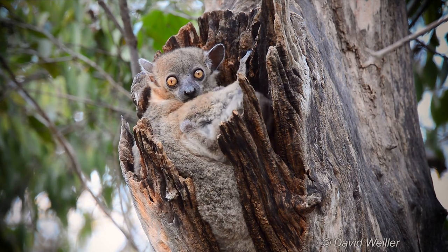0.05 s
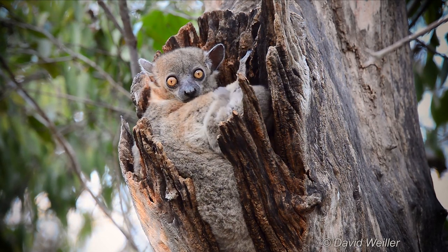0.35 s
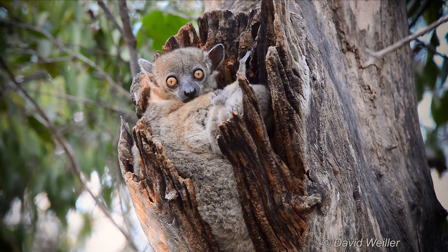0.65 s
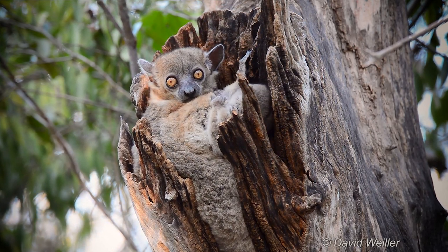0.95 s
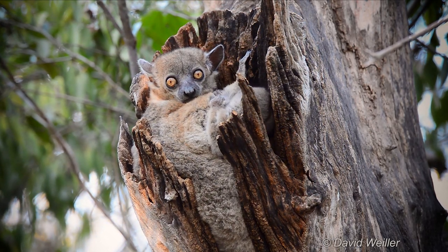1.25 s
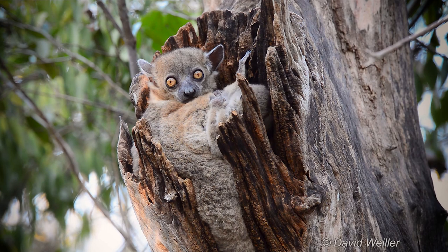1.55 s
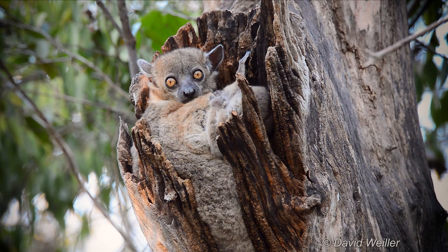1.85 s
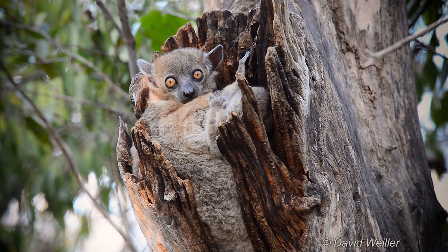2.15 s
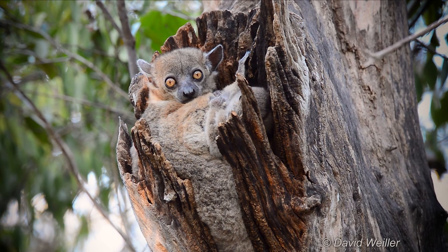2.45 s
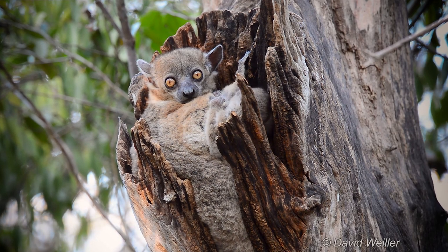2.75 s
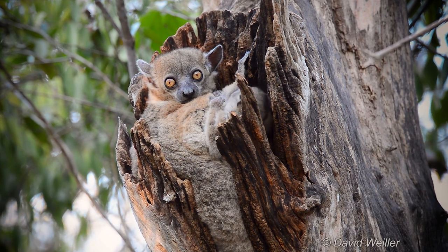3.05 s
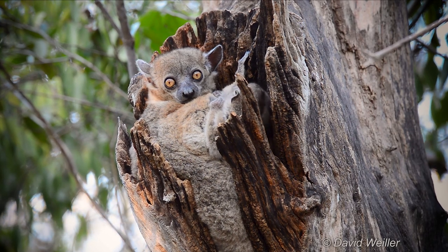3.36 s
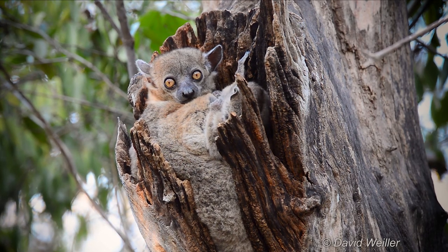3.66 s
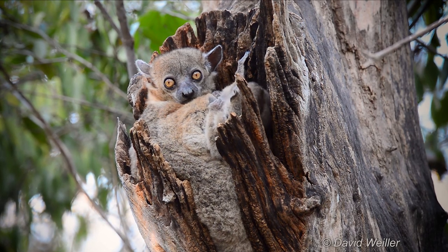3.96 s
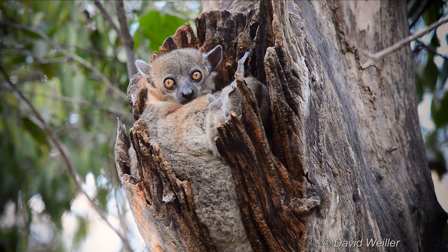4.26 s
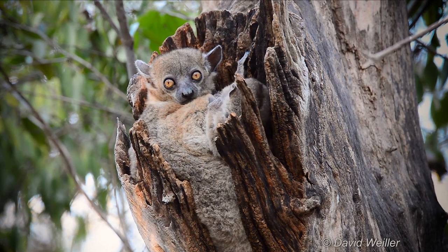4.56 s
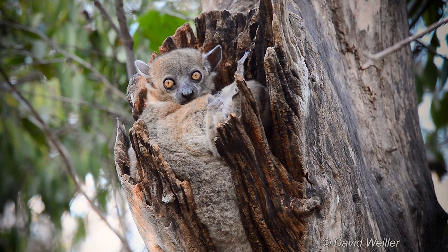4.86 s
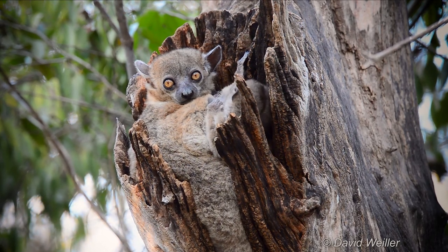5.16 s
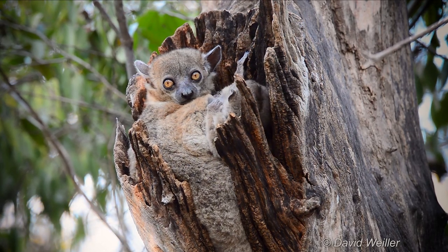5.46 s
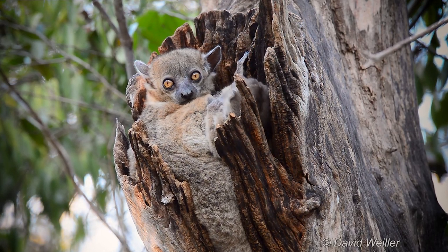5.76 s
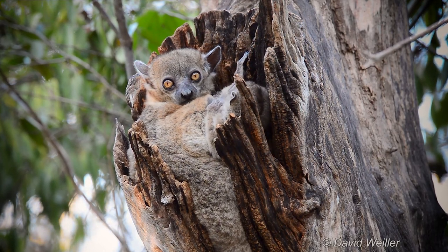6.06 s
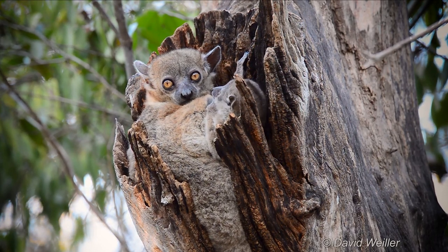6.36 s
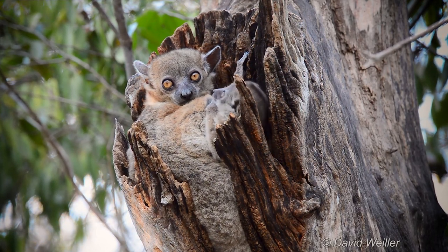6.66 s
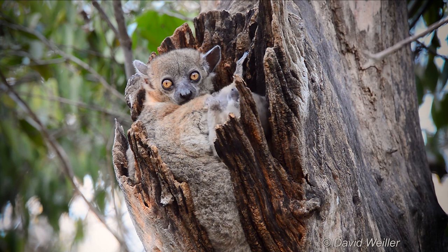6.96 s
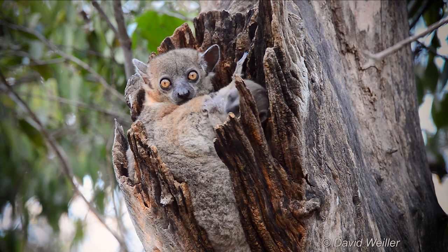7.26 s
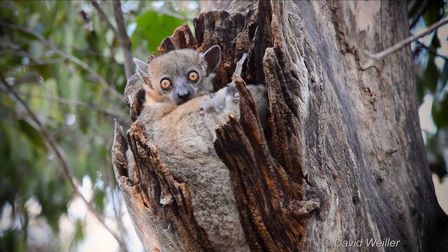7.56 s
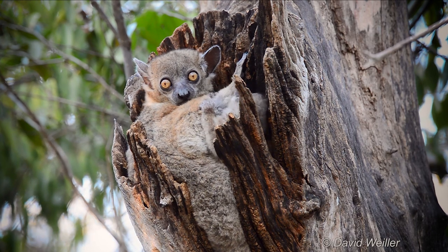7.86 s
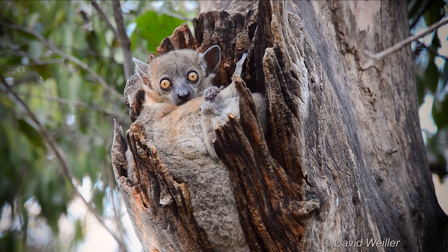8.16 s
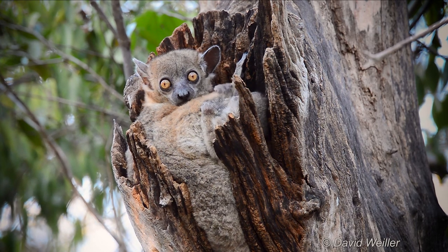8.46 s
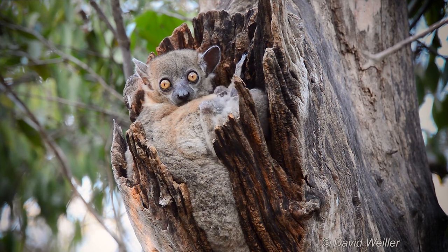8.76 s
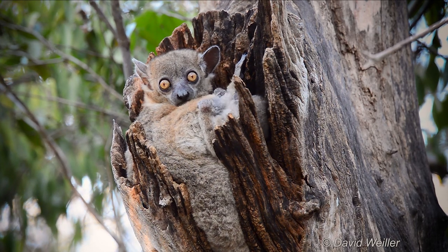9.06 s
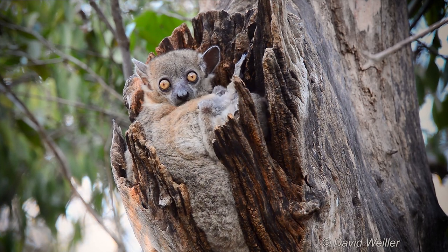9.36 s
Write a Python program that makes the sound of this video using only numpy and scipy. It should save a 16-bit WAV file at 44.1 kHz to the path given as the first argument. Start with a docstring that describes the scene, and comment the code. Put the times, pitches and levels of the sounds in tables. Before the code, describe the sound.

A still forest holds a faint rustle of air and a thin, steady trill of distant crickets. A nearer bush cricket makes a high double zip a little more than once a second. In the first 1.5 seconds, birds give light chirps and short rough notes, and one soft low bump reaches the microphone at 1.2 seconds. A rising whistle comes at 2.7 seconds and a lower, scooping one at 4.3. Louder slurred whistles follow at 5.2 and 5.8 seconds, echoing among the trunks. From about 5 seconds, faint high runs of cricket ticks and buzzes become more frequent. The birds call loudly again at 7.3 seconds, then in a quick cluster of gliding whistles from 7.9 to 8.4. Around 9 seconds a few weaker chirps sound over a very faint hum, with one tiny dry click at 9.3.

```python
"""Birds and crickets in a still, dry forest.

Birds trade loud slurred whistles and chirps (a gliding syrinx tone) and short rough notes that
echo among the trunks. Behind them bush crickets zip, tick and buzz in the treble by scraping
their wings, far crickets trill and the air rustles faintly. One soft low bump reaches the
microphone; near the end come a tiny click and a faint hum."""
import sys
import numpy as np
from scipy import signal
from scipy.fft import rfft, irfft, next_fast_len
from scipy.io import wavfile
from scipy.ndimage import uniform_filter1d, map_coordinates

SR = 44100
rng = np.random.default_rng(int(sys.argv[2]) if len(sys.argv) > 2 else 0)


def dump_mix(stems):
    """Bounce the given channels to the path in sys.argv[1] as a 16-bit WAV at rate SR."""
    frames = np.atleast_2d(stems).T  # one column per channel
    limited = np.clip(frames, -1, 1)  # hard clip at full scale
    pcm = np.round(limited * 32767).astype(np.int16)
    wavfile.write(sys.argv[1], SR, pcm)


N = 414981


def from_db(db):
    return 10 ** (np.asarray(db) / 20)


def unit_rms(x):
    return x / np.sqrt(np.mean(x ** 2) + 1e-20)


def phase_of(hz):
    return 2 * np.pi * np.cumsum(hz) / SR


def add(out, start_s, sound):
    at = int(np.clip(round(start_s * SR), 0, N))
    out[at:at + len(sound)] += sound[:N - at]


def colour(x, points):
    """Filter by a curve of freq_hz, gain_db."""
    hz, db = np.transpose(points)
    bins_hz = np.maximum(np.fft.rfftfreq(len(x), 1 / SR), 1)
    return irfft(rfft(x) * from_db(np.interp(np.log(bins_hz), np.log(hz), db)), len(x))


def drift(rate_hz, size=N):
    """Interpolated noise, standard deviation about 1."""
    steps = np.arange(size) * rate_hz / SR
    return map_coordinates(rng.standard_normal(int(steps[-1]) + 4), [steps + 1], order=1) * np.sqrt(1.5)


# Beak response to the second harmonic: harmonic_hz, gain_db
BEAK_RESPONSE = [(2400, -28), (3100, -27.5), (3700, -28), (4400, -20), (5450, -14), (6100, -34),
                 (8000, -38)]


def whistle(curve, waver, press_db, flutter_db=2.0, third_db=-25, edge_s=.003):
    """Near-pure gliding syrinx tone; pressing and the beak lift its overtones. Returns start_s, sound."""
    times_s, hz, db = np.transpose(curve)
    times_s = np.maximum.accumulate(times_s) + np.arange(len(times_s)) / SR
    t = np.arange(times_s[0] - edge_s, times_s[-1] + edge_s, 1 / SR)
    glide_hz = uniform_filter1d(np.interp(t, times_s, hz), size=180, mode="nearest")
    phase = phase_of(glide_hz * (1 + waver * drift(393.6, len(t))))
    edges = np.sin(np.pi / 2 * np.clip(np.minimum(t - t[0], t[-1] - t) / (2 * edge_s), 0, 1))
    level = from_db(np.interp(t, times_s, db) + flutter_db * drift(150, len(t))) * edges
    overtone_gain = from_db(press_db + np.interp(2 * glide_hz, *np.transpose(BEAK_RESPONSE)))
    overtones = overtone_gain * (np.sin(2 * phase) + from_db(third_db) * np.sin(3 * phase))
    return t[0], np.sqrt(2) * level * (np.sin(phase) + overtones)


# Whistle curves: time_s, pitch_hz, relative_db
CLIMB = [(2.615, 975, -68), (2.635, 1176, -60.5), (2.671, 1215, -61), (2.691, 1400, -54.5),
         (2.703, 1820, -42), (2.715, 1883, -45.5), (2.753, 1845, -43), (2.779, 1960, -42.5),
         (2.8, 2270, -51)]
LOW_SCOOP = [(4.245, 1190, -61), (4.255, 1404, -56), (4.271, 1413, -54.5), (4.287, 1367, -42.5),
             (4.305, 1331, -43), (4.385, 1321, -46.5), (4.403, 1384, -40.5), (4.421, 1825, -46.5),
             (4.428, 1992, -61)]
SWOOP = [(5.096, 2390, -62), (5.108, 3240, -53), (5.12, 3380, -52), (5.156, 3080, -38), (5.172, 3114, -42),
         (5.18, 2520, -41.5), (5.194, 2250, -40), (5.218, 2045, -27), (5.234, 1898, -38),
         (5.256, 1790, -35.5), (5.274, 1889, -33.5), (5.288, 2112, -33.5)]
DEEP_SCOOP = [(5.724, 1715, -35.5), (5.738, 2046, -37), (5.744, 2019, -34), (5.782, 1672, -25.5),
              (5.81, 1556, -29), (5.838, 1565, -29), (5.858, 1632, -25), (5.872, 1930, -33.5)]
RISE = [(7.232, 1712, -38.5), (7.242, 1985, -33), (7.282, 2077, -28.5), (7.308, 2270, -33.5)]
HIGH_FLIP = [(7.311, 2613, -38.5), (7.331, 2799, -48.5), (7.355, 2737, -41.5), (7.367, 2676, -44),
             (7.375, 2140, -28), (7.382, 1580, -39.5)]
HIGH_HOLD = [(7.898, 2772, -44), (7.91, 2533, -36.5), (7.936, 2581, -30), (7.947, 2605, -45)]
ARCH = [(8.115, 942, -68.5), (8.155, 997, -62.5), (8.171, 1238, -53.5), (8.207, 1372, -35),
        (8.233, 1760, -25.5), (8.259, 1946, -36.5), (8.281, 2100, -34.5), (8.291, 2117, -44),
        (8.299, 2153, -27), (8.317, 2116, -39), (8.343, 1759, -26.5), (8.357, 1545, -32.5)]
# Slurred whistles: curve, press_db, direct_db, echo_db
SLURS = [(CLIMB, -4, 1.3, 0.71), (LOW_SCOOP, -1.5, 0.7, 0), (SWOOP, 2.7, -0.26, -0.84),
         (DEEP_SCOOP, 1, -1.1, -1.1), (RISE, -3, -.5, -0.9), (HIGH_FLIP, -8, 1, 1),
         (HIGH_HOLD, 1.1, 0.53, 1), (ARCH, -7, -0.83, -.5)]


def bird_slurs(waver=.005):
    """Long whistles; the way the bird faces splits each into direct sound and echo send."""
    direct, send = np.zeros((2, N))
    for curve, press_db, direct_db, echo_db in SLURS:
        start_s, sound = whistle(curve, waver, press_db)
        add(direct, start_s, from_db(direct_db) * sound)
        add(send, start_s, from_db(echo_db) * sound)
    return np.array([direct, send])


# Chirps: start_s, length_s, start_hz, middle_hz, end_hz, relative_db, peak_fraction, press_db,
# distance (-1 closest, 1 far)
CHIRPS = [(0.105, 0.048, 1356, 1420, 1800, -55, 0.7, -5, 0.27),
          (0.15, 0.093, 2500, 2610, 2580, -64.5, 0.2, -1, 1),
          (0.476, 0.073, 2950, 3340, 3410, -60.5, 0.1, 3, 1),
          (0.61, 0.083, 2850, 2375, 2220, -52.5, 0.7, -8, 1),
          (0.692, 0.087, 2390, 2190, 1934, -46, 0.87, -3.5, 1),
          (.89, 0.028, 2440, 2650, 2850, -49.5, 0.5, -7, 0.37),
          (0.95, 0.07, 3410, 3120, 2820, -40.5, 0.8, -5, -0.32),
          (1.231, 0.057, 1980, 2047, 2040, -57.5, 0.6, 9.5, 0.88),
          (1.287, 0.0543, 2003, 1875, 1660, -53.5, 0.65, -8, 1),
          (5.68, 0.034, 1595, 1663, 1920, -37, 0.8, 0, 0.47),
          (7.384, .02, 2666, 1514, 2070, -36.5, 0, -1, -0.38),
          (7.836, 0.0646, 3690, 3273, 3310, -40, 0.9, -7, 0.5),
          (7.967, 0.019, 2684, 2820, 1890, -33.5, 0.36, 1, 0.42),
          (8.1, 0.039, 1700, 1880, 1920, -50, 0, -9, 0),
          (8.901, 0.035, 2094, 1997, 2070, -59.5, 0.4, -3, 1),
          (9.172, 0.12, 1600, 1740, 1870, -64, 0.6, -4, 1),
          (9.391, 0.038, 1510, 1400, 1400, -43, 0.9, 7, 0.2)]


def bird_chirps(rise_db=10, fall_db=14, near_waver=.005, far_waver=.017):
    """Short whistles on a parabola of pitch; far birds waver more and are mostly echo."""
    direct, send = np.zeros((2, N))
    u = np.linspace(0, 1, 20)
    for start_s, length_s, *pitches_hz, db, peak_fraction, press_db, distance in CHIRPS:
        hz = np.polyval(np.polyfit([0, .5, 1], pitches_hz, 2), u)
        top = np.clip(peak_fraction, .05, .95)
        drop_db = np.where(u < top, rise_db * (1 - u / top) ** 2, fall_db * ((u - top) / (1 - top)) ** 2)
        curve = np.transpose([start_s + length_s * u, hz, db - drop_db])
        waver = near_waver * (far_waver / near_waver) ** distance
        onset_s, sound = whistle(curve, waver, press_db)
        add(direct, onset_s, from_db(-3.5 * distance) * sound)
        add(send, onset_s, from_db(3 * distance - .5) * sound)
    return np.array([direct, send])


def rough_tone(length_s, hz, scatter_hz, jitter_rate_hz=900, rough_db=4, second_db=-22):
    """Band-passed swell whose pitch and strength jump about."""
    size = int(length_s * SR)
    phase = phase_of(hz + scatter_hz * drift(jitter_rate_hz, size))
    tone = np.sin(phase) * from_db(rough_db * drift(500, size))
    edge_ratio = 1 + 2.9 * scatter_hz / hz
    band = signal.butter(2, [hz / edge_ratio, hz * edge_ratio], "band", fs=SR, output="sos")
    tone = unit_rms(signal.sosfilt(band, tone)) + from_db(second_db) * np.sin(2 * phase)
    return tone * np.sin(np.linspace(0, np.pi, size))


# Short rough bands: middle_s, length_s, pitch_hz, scatter_hz, level_db
ROUGH_BANDS = [(0.024, 0.058, 1675, 149, -64.5), (0.546, 0.15, 3290, 254, -62.5),
               (0.935, 0.13, 1910, 175, -58), (1.05, 0.035, 2250, 390, -50.5),
               (1.039, 0.025, 4400, 200, -63.5), (1.141, 0.077, 5720, 600, -63.5),
               (1.199, 0.036, 1334, 148, -62.5), (1.371, 0.11, 1854, 119, -59),
               (2.682, 0.024, 1542, 200, -56), (2.947, 0.061, 2080, 172.4, -57.5),
               (3.067, 0.057, 2110, 259, -58), (3.397, 0.086, 1876, 260, -58.5),
               (4.236, 0.041, 1875, 450, -60), (5.716, 0.042, 2220, 500, -48),
               (6.271, 0.22, 3940, 280, -74), (7.228, .044, 2150, 378, -42.5), (7.982, .08, 5520, 260, -54),
               (7.967, .06, 2844, 180, -34.5)]


def rough_bands():
    """Short rough bands of sound: hoarse notes and a whistle's diffuse ring among the trees."""
    out = np.zeros(N)
    for middle_s, length_s, hz, scatter_hz, db in ROUGH_BANDS:
        add(out, middle_s - length_s / 2, from_db(db) * rough_tone(length_s, hz, scatter_hz))
    return out


def wing_stroke(hz, fall, length_s, scrape=.011):
    """A file runs over the wing's edge and slows, so its tone falls."""
    u = np.linspace(0, 1, int(length_s * SR))
    pitch_hz = hz * (1 + fall * (.5 - u) + scrape * drift(1800, len(u)))
    return np.sin(np.pi * u) * np.sin(phase_of(pitch_hz))


def stridulation(pitch_hz, width_hz, stroke_hz, depth):
    """Swelling burst of wing strokes: a narrow scratchy band along a pitch curve."""
    size, phase = len(pitch_hz), phase_of(pitch_hz)
    band = drift(2 * width_hz, size) * np.sin(phase) + drift(2 * width_hz, size) * np.cos(phase)
    throb = 1 + depth * np.sin(2 * np.pi * stroke_hz * np.arange(size) / SR)
    return unit_rms(band * throb) * np.sin(np.linspace(0, np.pi, size))


def buzz(length_s, hz):
    """Fast wing strokes at a steady pitch."""
    return stridulation(np.full(int(length_s * SR), hz), width_hz=190, stroke_hz=80, depth=.7)


# Double zips: time_s, relative_db
ZIP_PAIRS = [(.7786, -55.5), (1.78, -56), (2.633, -56.5), (3.473, -56.5), (4.364, -57), (5.237, -53),
             (5.953, -55.5), (6.862, -55.5), (7.8401, -54), (8.665, -55.5), (9.3831, -54)]


def cricket_zips(hz=7270):
    """A near bush cricket makes two wing strokes, the first slightly softer."""
    out = np.zeros(N)
    for time_s, db in ZIP_PAIRS:
        for lead_s, gain_db in ((.0556, -4), (.0051, -3)):
            add(out, time_s - lead_s, from_db(db + gain_db) * wing_stroke(hz, fall=.093, length_s=.0221))
    return out


# Tick phrases: run_start_s, relative_db
TICK_PHRASES = [(-.15, -76.5), (.583, -75), (1.33, -74.5), (5.24, -70.5), (5.936, -70.5), (6.635, -70),
                (7.371, -70.5), (8.116, -71)]


def cricket_ticks(tick_hz=10870, buzz_hz=10520, lead_s=.135, run_s=.27, buzz_s=.17):
    """Another near bush cricket: a lone tick, then a quickening run over a buzz."""
    out = np.zeros(N)
    gaps_s = .0205 + .022 * .55 ** np.arange(20)
    offsets_s = np.append(-lead_s, np.cumsum(gaps_s) - gaps_s)
    for start_s, db in TICK_PHRASES:
        ticks_s = start_s + offsets_s[offsets_s <= run_s]
        for tick_s in ticks_s[ticks_s >= 0]:
            add(out, tick_s, from_db(db + 3) * wing_stroke(tick_hz, fall=.04, length_s=.017, scrape=.005))
        add(out, start_s + (run_s - buzz_s) / 2, from_db(db - 6.5) * buzz(buzz_s, buzz_hz))
    return out


def bump(start_s=1.187, hz=47, gain_db=-45, length_s=.072, attack_s=.0023):
    """A soft knock rocks the microphone for a few slow cycles."""
    out, t = np.zeros(N), np.arange(int(length_s * SR)) / SR
    envelope = np.cos(np.pi / 2 * t / length_s) ** 2 * (1 - np.exp(-t / attack_s))
    add(out, start_s, from_db(gain_db) * envelope * np.sin(2 * np.pi * hz * t))
    return out


def twig(start_s=9.262, level_db=-57, decay_s=.0025):
    """One tiny dry click."""
    out, t = np.zeros(N), np.arange(SR // 50) / SR
    band = signal.butter(2, [1200, 7000], "band", fs=SR, output="sos")
    crack = unit_rms(signal.sosfilt(band, rng.standard_normal(len(t))))
    add(out, start_s, from_db(level_db) * crack * np.exp(-t / decay_s))
    return out


# Buzz series: first_s, stop_s, period_s, length_s, pitch_hz, level_db
BUZZ_SERIES = [(5.63, 8.1, .386, .09, 10070, -79), (4.85, 8.9, .768, .08, 10680, -75),
               (3.78, 9.2, 5.12, .28, 10290, -77)]


def paced_buzzes():
    """Far insects, each buzzing at an even pace."""
    out = np.zeros(N)
    for first_s, stop_s, period_s, length_s, hz, db in BUZZ_SERIES:
        for middle_s in np.arange(first_s, stop_s, period_s):
            add(out, middle_s - length_s / 2, from_db(db) * buzz(length_s, hz))
    return out


# Rising lisps: time_s
LISPS_S = [.42, 1.18, 1.58, 2.27, 2.78, 3.28, 3.83, 4.08, 4.5, 5.24, 5.89, 6.45, 7.29, 7.88, 8.62, 9.06,
           9.31]


def far_lisps(length_s=.3, lead_s=.16, low_hz=7550, top_hz=8200, base_db=-79.5, growth_db_per_s=.8):
    """A far insect's lisps climb as its wings speed up, each louder than the last."""
    out = np.zeros(N)
    climb_hz = low_hz + (top_hz - low_hz) * np.sin(np.linspace(0, np.pi / 2, int(length_s * SR)))
    for time_s in LISPS_S:
        pitch_hz = climb_hz * (1 + .008 * drift(25, len(climb_hz)))
        lisp = stridulation(pitch_hz, width_hz=400, stroke_hz=29, depth=.18)
        add(out, time_s - lead_s, from_db(base_db + growth_db_per_s * time_s) * lisp)
    return out


def stray_buzzes(count=14, hz=10480, spread_hz=140, length_s=.11, level_db=-81, spread_db=2):
    """Other bush crickets buzz at random moments."""
    out = np.zeros(N)
    for start_s in rng.uniform(0, N / SR, count):
        sound = buzz(length_s, rng.normal(hz, spread_hz))
        add(out, start_s, from_db(rng.normal(level_db, spread_db)) * sound)
    return out


def stray_zips(count=40, hz=7280, spread_hz=260, peak_db=-69, spread_db=3):
    """Bush crickets further off make single wing strokes at random moments."""
    out = np.zeros(N)
    for start_s in rng.uniform(0, N / SR, count):
        stroke = wing_stroke(rng.normal(hz, spread_hz), fall=.093, length_s=.024)
        add(out, start_s, from_db(rng.normal(peak_db, spread_db)) * stroke)
    return out


# Far choirs: pitch_hz, width_hz, level_db, swell_db, stroke_hz, stroke_depth
CHOIRS = [(4180, 154, -77.5, 0.8, 30, 0.5), (4774, 8.6, -79, 1.5, 16.5, 0.07),
          (5000, 240, -78.5, -1.5, 30, 0), (5500, 82, -82.5, -5.5, 44, .1), (7270, 230, -74.5, 3, 56, 0.4),
          (7850, 230, -78.5, 1.8, 32, 0.2), (10620, 210, -83, -1.2, 70, .25)]


def insect_choirs(swell_rate_hz=7, stroke_waver=.017):
    """Many far insects of a kind merge into a narrow band that throbs with their wing strokes."""
    out, size = np.zeros(N), next_fast_len(N)
    bins_hz = np.fft.rfftfreq(size, 1 / SR)
    for hz, width_hz, db, swell_db, stroke_hz, depth in CHOIRS:
        bell = np.exp(-((bins_hz - hz) / width_hz / 2) ** 2)
        band = irfft(rfft(rng.standard_normal(size)) * bell, size)[:N]
        throb = 1 + depth * np.sin(phase_of(stroke_hz * (1 + stroke_waver * drift(3))))
        swell = from_db(swell_db * drift(swell_rate_hz))
        out += from_db(db) * unit_rms(band * throb * swell)
    return out


# Low hum: start_s, length_s, pitch_hz, scatter_hz, level_db
FAR_HUM = (9, 1.4, 810.5, 77, -77.5)


def far_hum():
    """A faint narrow band swells near the end."""
    out = np.zeros(N)
    start_s, length_s, hz, scatter_hz, db = FAR_HUM
    add(out, start_s, from_db(db) * rough_tone(length_s, hz, scatter_hz))
    return out


# Rustle spectrum: freq_hz, relative_db
AIR_SPECTRUM = [(20, -6), (50, -2.5), (120, 0), (260, 0), (500, -1), (900, -5), (2000, -9), (3000, -11.5),
                (5000, -12.5), (6500, -13.5), (8000, -18.5), (9000, -20.5), (12000, -22), (16000, -23)]


def air(level_db=-64.5):
    """Steady faint rustle of air and far foliage."""
    noise = rng.standard_normal(next_fast_len(N))
    return from_db(level_db) * unit_rms(colour(noise, AIR_SPECTRUM)[:N])


# Echo spectrum: freq_hz, gain_db
ECHO_SPECTRUM = [(800, 26), (1500, 2), (2200, 5.5), (3200, 8.5), (4300, 17.5), (8000, 4)]
# Tail decay: freq_hz, t60_s
TAIL_DECAY = [(800, 1.28), (1700, 1.09), (3100, 0.97), (4100, 0.65), (10000, 0.53)]


def forest_echo(x, near_db=-12, near_t60_s=.27, far_db=-18, build_s=.033, trunks_per_s=1500):
    """Near trunks give a spray of echoes, the deeper wood a smooth tail; leaves soak up its treble."""
    t = np.arange(2 * SR) / SR
    trunks = rng.standard_normal(len(t)) * (rng.random(len(t)) < trunks_per_s / SR) * (t > .004)
    near = trunks * np.exp(-np.log(1000) * t / near_t60_s)
    hz, frames_s, cells = signal.stft(rng.standard_normal(len(t)), SR, nperseg=256)
    t60_s = np.interp(hz, *np.transpose(TAIL_DECAY))
    decay = np.exp(-np.log(1000) * frames_s / t60_s[:, None])
    tail = signal.istft(cells * decay, SR)[1][:len(t)]
    far = tail * (1 - np.exp(-t / build_s))
    echoes = (from_db(near_db) * unit_rms(near) + from_db(far_db) * unit_rms(far)) / np.sqrt(len(t))
    return signal.fftconvolve(x, colour(echoes, ECHO_SPECTRUM)[:3 * SR // 2])[:N]


def scene(whistle_gain_db=1.02):
    """Birds and near insects with their echoes, over far insects and air; mono."""
    direct, send = from_db(whistle_gain_db) * (bird_slurs() + bird_chirps())
    echoing = rough_bands() + cricket_zips() + cricket_ticks() + twig() + far_hum()
    far_insects = paced_buzzes() + far_lisps() + stray_buzzes() + stray_zips() + insect_choirs()
    return (direct + echoing + forest_echo(send + echoing) + far_insects + air() + bump())[None]


def record(dry, cutoff_hz=15750):
    """Steep low-pass."""
    return signal.sosfilt(signal.ellip(12, .1, 80, cutoff_hz, fs=SR, output="sos"), dry)


dry = scene()
out = record(dry)
dump_mix(out)
```